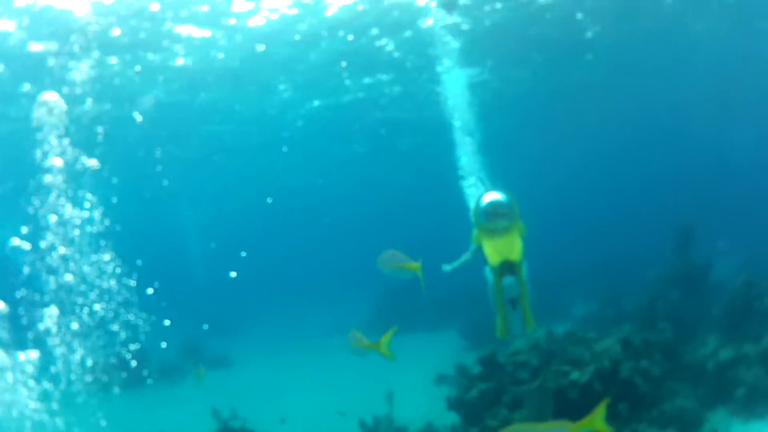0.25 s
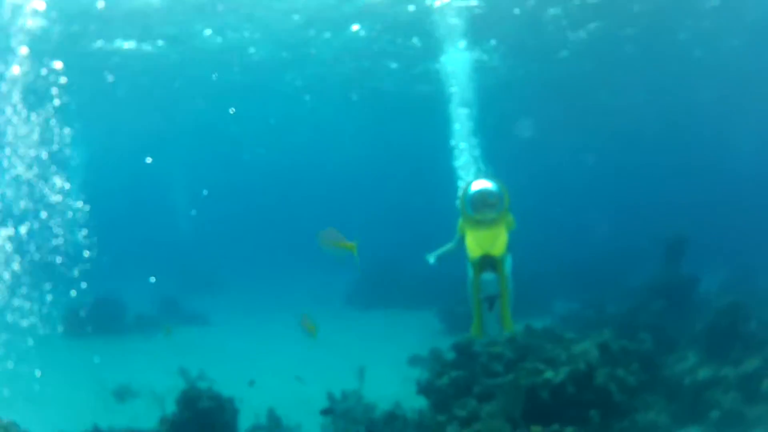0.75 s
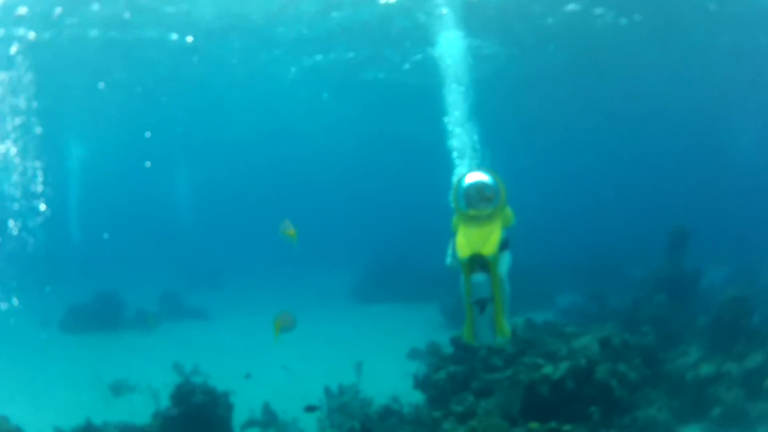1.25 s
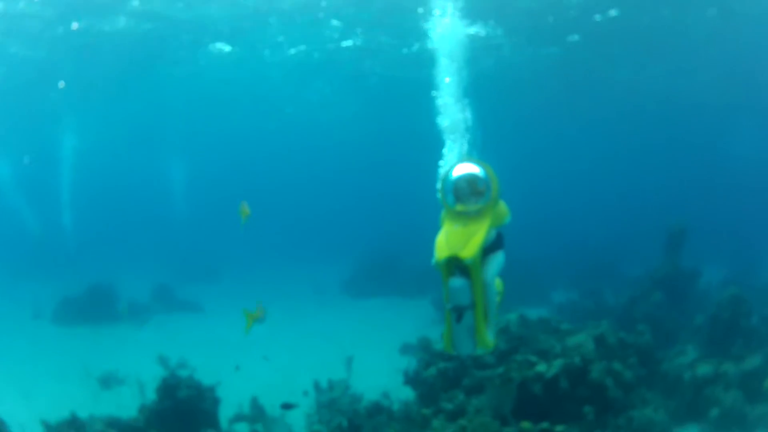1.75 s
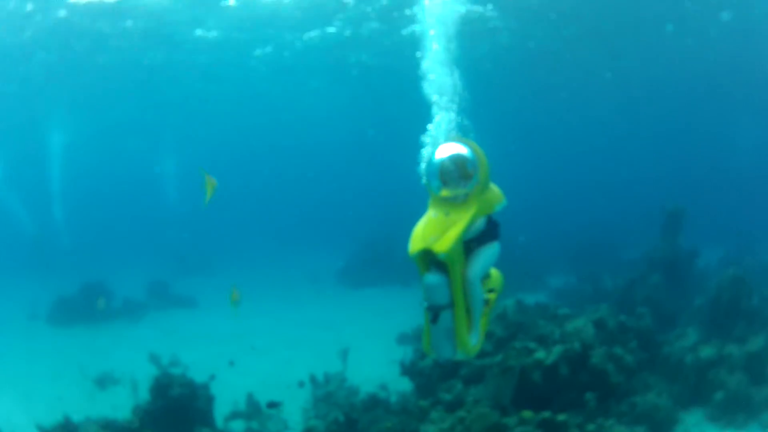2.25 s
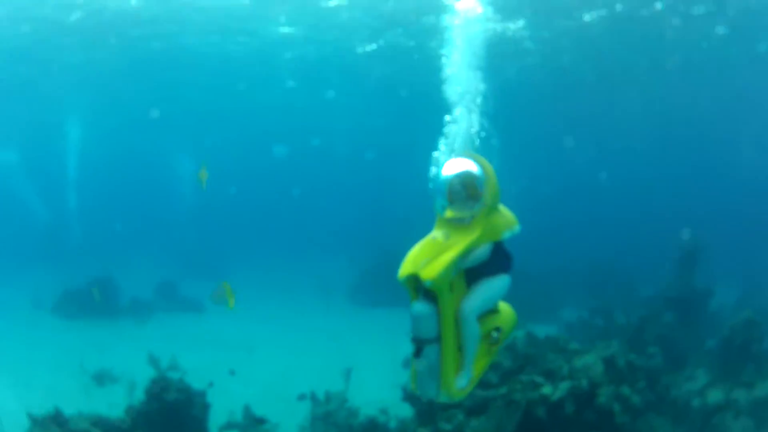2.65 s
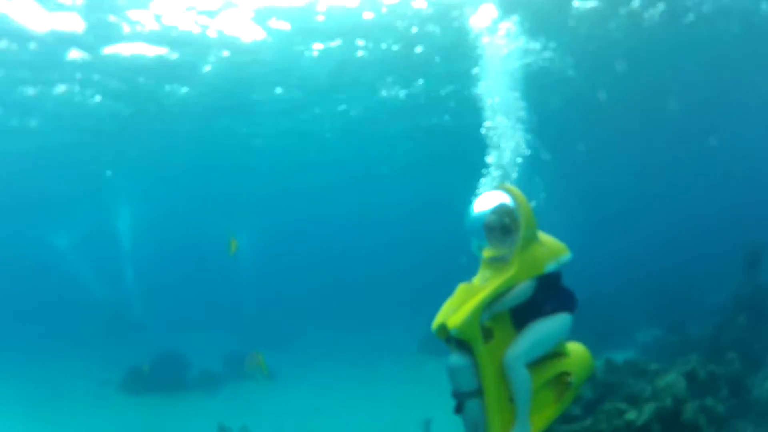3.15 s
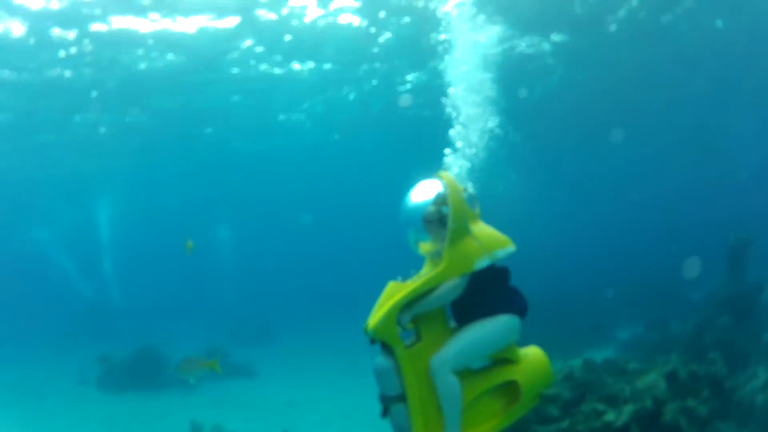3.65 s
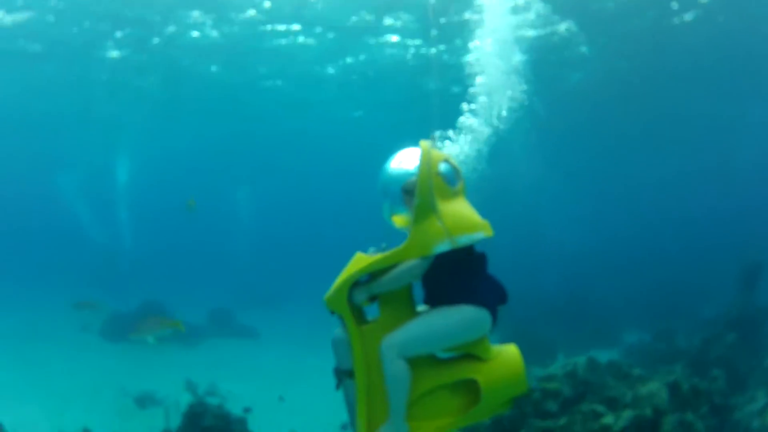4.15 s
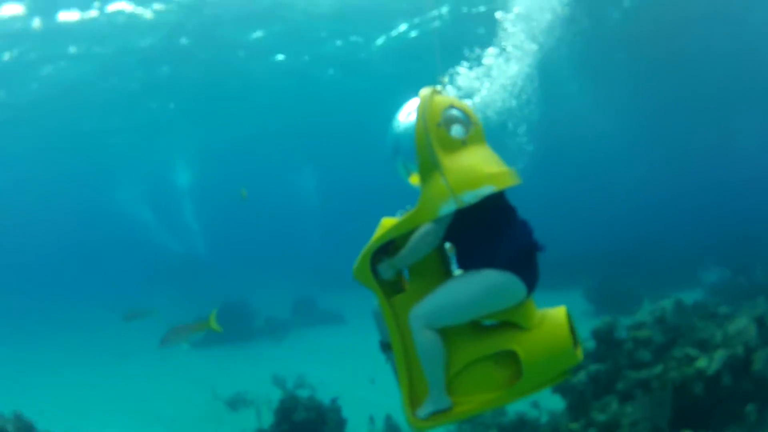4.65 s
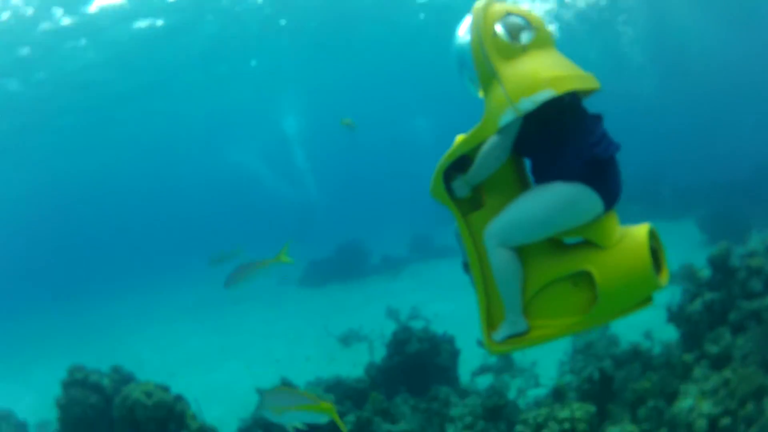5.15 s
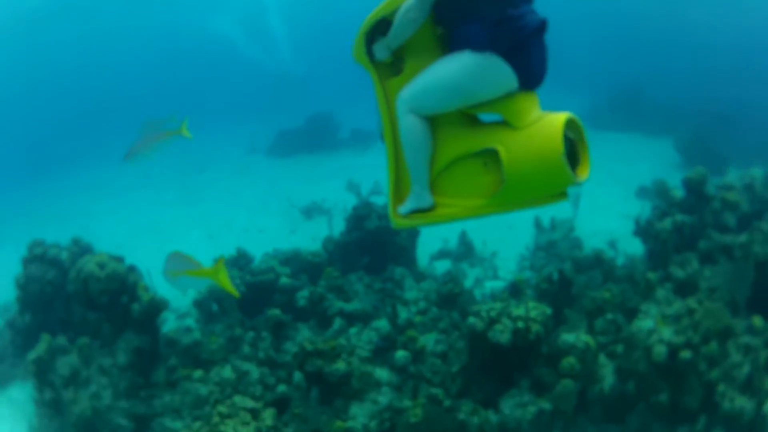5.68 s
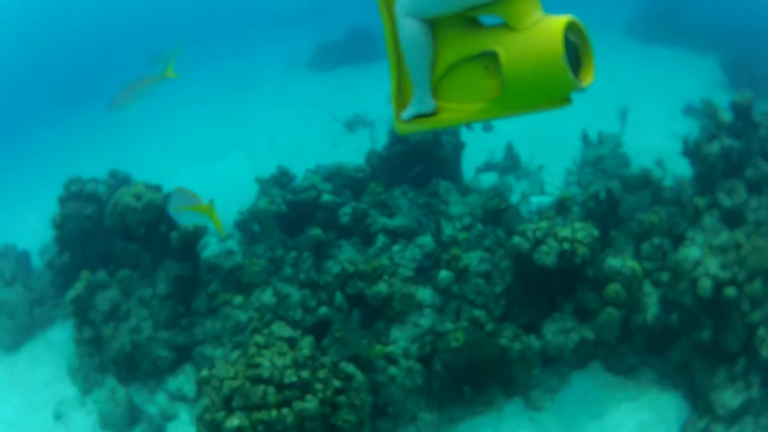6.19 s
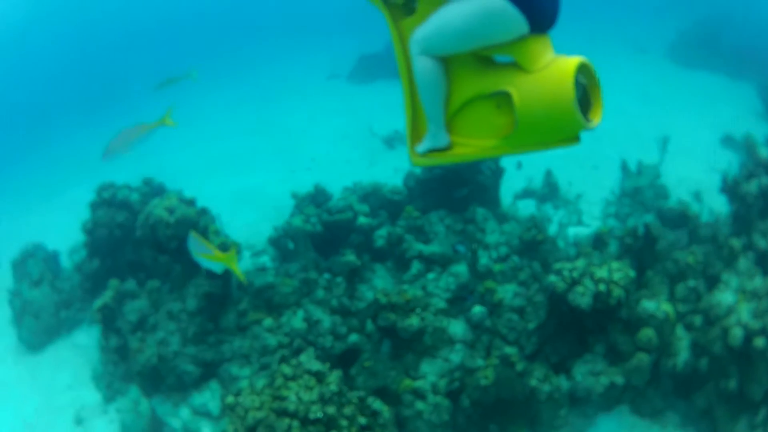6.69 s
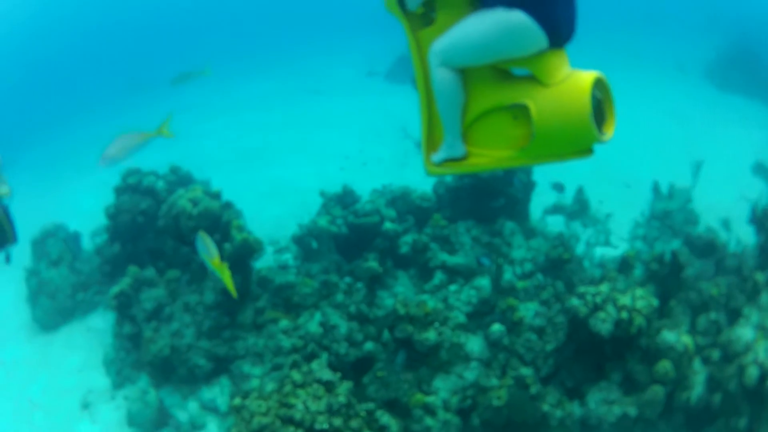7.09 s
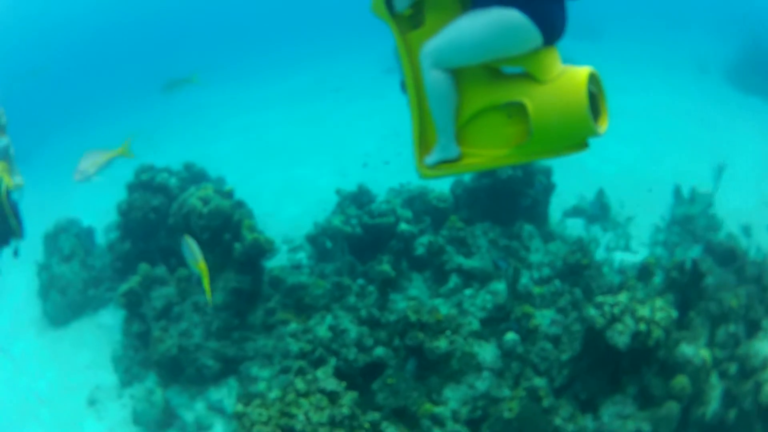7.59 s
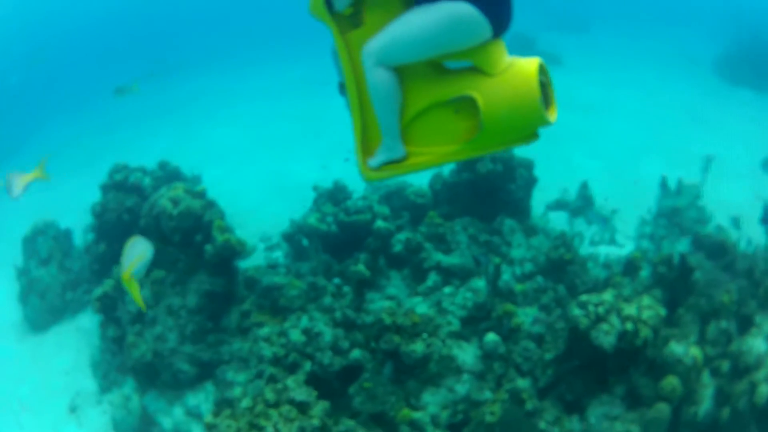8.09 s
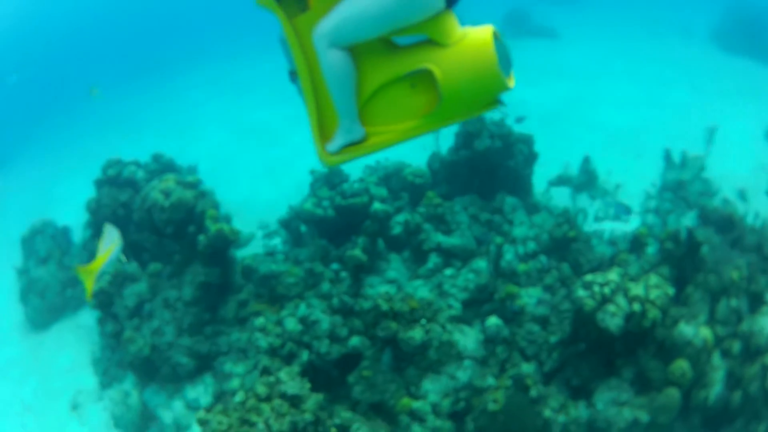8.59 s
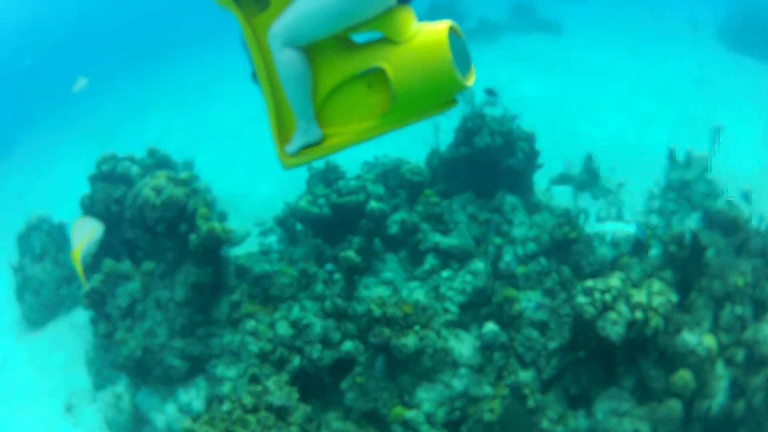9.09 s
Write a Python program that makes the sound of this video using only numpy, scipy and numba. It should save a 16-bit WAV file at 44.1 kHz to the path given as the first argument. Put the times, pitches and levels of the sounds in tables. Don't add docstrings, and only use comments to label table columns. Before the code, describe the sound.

Underwater, a low motor hum with gurgling exhaust bubbles and watery hiss, then a soft crackling propeller flutter as the scooter comes alongside.

```python
import sys
import numpy as np
from scipy import signal
from scipy.io import wavfile
from scipy.ndimage import uniform_filter1d
from numba import njit

SR = 44100
rng = np.random.default_rng(int(sys.argv[2]) if len(sys.argv) > 2 else 0)


def unload_wav(signal):
    wavfile.write(
        sys.argv[1],
        SR,
        np.round(np.clip(np.atleast_2d(signal).T, -1, 1) * 32767).astype(np.int16),
    )


def natural_amplitude(level_db):
    exponent = np.asarray(level_db, float) / 20
    return 10 ** exponent


N = 411453

# (pitch [Hz], width [Hz], level [dB])
DEEP_MODES = [(1393, 175, 10.2), (1705, 137, 4.3)]
MID_MODES = [(2276, 140, 7), (2468, 760, -4), (2865, 103, 1.5), (3300, 720, -11)]


def rms_one(x):
    return x / np.sqrt(np.mean(x ** 2) + 1e-20)


def in_time(rows):
    s, *columns = np.transpose(rows)
    return [np.interp(np.arange(N) / SR, s, c) for c in columns]


def drift(rate):
    r = np.exp(-80 * np.pi * rate / SR)
    slow = signal.lfilter([1], [1, -2 * r, r * r], rng.standard_normal(N // 40 + 2002))[2000:]
    return np.interp(np.arange(N) / 40, np.arange(len(slow)), rms_one(slow))


def flutter(rate):
    quick = drift(rate)
    return rms_one(quick - uniform_filter1d(quick, SR // 5))


def band(x, low_hz, high_hz, order=2):
    return signal.sosfilt(signal.butter(order, [low_hz, high_hz], "band", fs=SR, output="sos"), x)


def low_pass(x, hz, order):
    return signal.sosfilt(signal.butter(order, hz, fs=SR, output="sos"), x)


def resonate(x, modes, filled=False):
    out = np.zeros(N)
    for k, (hz, width_hz, db) in enumerate(modes):
        r = np.exp(-np.pi * width_hz / SR)
        sign = (-1) ** (k * filled)
        top = (1 - r * r) / 2 * np.array([1, 0, -1]) * sign
        out += natural_amplitude(db) * signal.lfilter(top, [1, -2 * r * np.cos(2 * np.pi * hz / SR), r * r], x + 1e-18)
    return out


@njit
def add(out, at, hz, size, cycles, rise, rate):
    for i in range(len(at)):
        phase, span = 0.0, cycles * rate / hz[i]
        for n in range(min(int(5 * span), len(out) - at[i])):
            phase += 2 * np.pi * hz[i] * (1 + rise * n / span) / rate
            swelling = (1 - np.exp(-n * hz[i] / rate)) ** 2
            out[at[i] + n] += size[i] * np.sin(phase) * np.exp(-n / span) * swelling


def bubbles(per_s, centre_hz, octaves, cycles, rise, even, window_s):
    draws = rng.random((int(per_s * N / SR), 2))
    at = (draws[:, 0] * N).astype(np.int64)
    chance = rng.standard_normal((len(at), 2))
    hz = centre_hz[at] * 2 ** (octaves * chance[:, 0])
    out = np.zeros(N)
    add(out, at, hz, natural_amplitude(2.8 * chance[:, 1]), cycles, rise, float(SR))
    window = int(window_s * SR)
    power = uniform_filter1d(uniform_filter1d(out ** 2, window), window) + 1e-9
    return rms_one(out / power ** (even / 2))


def closeness():
    # (time [s], level [dB])
    near = [(0, -23), (2.0, -24.5), (3.2, -26.5), (4.4, -23), (5.2, -27.5), (5.8, -29), (6.2, -32),
            (7.6, -33.5), (9.33, -31)]
    return in_time(near)[0] + 24


def hum():
    # (multiple [-], level over the second order [dB], extra share of closeness [-])
    hum_orders = [(1, -7.5, 0.42), (2, 0.5, 0.028), (3, -0.5, -0.062), (4, -5, -0.29), (5, -9, -.3),
                  (6, -12, -0.58), (7, -19, -0.75)]
    hum_hz = 32.79
    turn = 2 * np.pi * hum_hz * np.arange(N) / SR + .12 * drift(.4)
    close = closeness()
    out = np.zeros(N)
    for k, db, share in hum_orders:
        level_db = close - 24 + db + share * close
        waver_db = 0.72 * drift(1.5) + 1.04 * drift(0.88)
        out += natural_amplitude(level_db + waver_db) * np.sin(k * turn + 6 * rng.random())
    return np.sqrt(2) * out


def swell(s, length_s):
    return 2 ** -((np.arange(N) / SR - s) / (.5 * length_s)) ** 2


def flow():
    # (middle [s], peak [dB], pitch [Hz], length [s])
    gulps = [(0.06, -13.6, 106, 0.16), (0.452, -11, 116.5, 0.073), (0.915, -11.6, 129, 0.1),
             (1.121, -9, 129, 0.037), (1.798, -12.0, 98.5, 0.35), (2, -14, 106, 0.24),
             (2.41, -13, 118.6, 0.057), (2.617, -14.5, 121, 0.044), (2.823, -12.5, 113, 0.11),
             (3.38, -17.1, 121, 0.035), (3.678, -9.5, 117, 0.11), (3.845, -12, 108.8, 0.045),
             (4.255, -12.5, 107, 0.15), (4.47, -13, 112, 0.086), (5.7, -19, 127, 0.031),
             (5.878, -12.5, 140, 0.061), (6.827, -24.5, 105.7, 0.27), (7.068, -24, 118, 0.14),
             (7.353, -22, 120, 0.11), (7.815, -23.5, 114.5, 0.26), (7.97, -22.5, 99.6, 0.22),
             (8.16, -21.4, 119, 0.061), (8.367, -19.8, 122, 0.14), (8.812, -18.5, 123.7, 0.14),
             (9.253, -20.5, 120.4, 0.14)]
    # (middle [s], peak [dB])
    splutters = [(.22, -30), (.46, -29), (.6, -19), (.92, -23.5), (1.7, -18.5), (2.18, -25), (3.85, -24),
                 (4.2, -37), (5.25, -27), (7.3, -27), (8.14, -28.5), (8.27, -25.5)]
    stream_hz, splutter_s = 117, 0.056
    stream_db = -21 + 0.81 * closeness()
    power = natural_amplitude(2 * stream_db)
    pitch = power * stream_hz
    for s, db, hz, length_s in gulps:
        gulp = natural_amplitude(2 * (db - 3.2)) * swell(s, length_s)
        power, pitch = power + gulp, pitch + gulp * hz
    large_db = 10 * np.log10(power)
    fizz_db = -28.5 + 0.34 * closeness() + 0.32 * (large_db - stream_db)
    fizz = natural_amplitude(2 * fizz_db)
    for s, db in splutters:
        fizz = fizz + natural_amplitude(2 * db) * swell(s, splutter_s)
    return large_db, pitch / power, 10 * np.log10(fizz)


def air():
    # (pitch [Hz], width [Hz], level [dB])
    housing_low_modes = [(94.8, 20, 3), (128.6, 22, -0.5)]
    large_db, large_hz, small_db = flow()
    large = bubbles(60, 0.973 * large_hz, octaves=0.15, cycles=1.69, rise=0.056, even=0.34, window_s=0.034)
    large = rms_one(large + resonate(large, housing_low_modes))
    small_hz = 220.7 * natural_amplitude(0.061 * closeness())
    small = bubbles(160, small_hz, octaves=0.34, cycles=2.7, rise=0.077, even=0.34, window_s=0.033)
    gurgle = natural_amplitude(large_db + 0.7) * band(large, 64.4, 195) + natural_amplitude(small_db + 0.68) * small
    rumble = natural_amplitude(-39.5 + 0.24 * (large_db + 42)) * rms_one(band(rng.standard_normal(N), 18, 59))
    seethe = natural_amplitude(-45 + .5 * (small_db + 27.5)) * rms_one(band(rng.standard_normal(N), 195, 356))
    return low_pass(gurgle, 305, order=6) + rumble + seethe


def hiss():
    # (pitch [Hz], width [Hz], level [dB])
    low_modes = [(496, 720, -3), (887, 56, 6.5)]
    water_modes = [(1324, 42, 4), (1840, 87, 7.5), (2355, 187, 6), (2660, 53, 7), (3060, 69, -29),
                   (3715, 153, -3), (4310, 90, -5), (4600, 43, -35), (4890, 100, -29), (6480, 300, -8)]
    high_modes = [(3705, 95, 11), (3800, 98, -2), (4240, 33, 1), (4610, 150, -24), (4950, 130, -38)]
    # (middle [s], half length [s], level [dB])
    puffs = [
        (1.93, 0.0044, -43),
        (7.855, .004, -58),
        (5.905, 0.033, -49.5),
    ]
    t = np.arange(N) / SR
    crackle = (rng.random((3, N)) < 40 / SR) * rng.standard_normal((3, N)) * 2.25
    noise = rng.standard_normal((3, N)) + crackle

    low_db = -44 + 0.37 * closeness()
    low = band(resonate(noise[0], low_modes, filled=True), 253, 1040, order=3)
    low = natural_amplitude(low_db + 1.9 * flutter(12.4)) * rms_one(low)

    water_db = -42 + 0.44 * closeness()
    water = natural_amplitude(water_db + 1.52 * flutter(35)) * rms_one(resonate(noise[1], water_modes))
    gush = rms_one(band(noise[0], 4000, 4700))
    for s, length_s, db in puffs:
        water += natural_amplitude(db) * np.exp(-((t - s) / length_s) ** 4) * gush
    water += natural_amplitude(water_db - 37.0) * rms_one(band(crackle[0], 3900, 5000))

    far_db, near_db, arrives_s, arrival_s = -45.5, -42, 4.6, 1.0
    whirr_db = far_db + (near_db - far_db) / (1 + np.exp((arrives_s - t) / arrival_s))
    whirr = resonate(noise[2], MID_MODES, filled=True) + natural_amplitude(-13.5) * resonate(noise[2], DEEP_MODES)
    whirr += natural_amplitude(-9.0) * resonate(noise[2], high_modes)
    whirr = natural_amplitude(whirr_db + 1.3 * flutter(32)) * rms_one(whirr)
    return low + low_pass(water + whirr, 4800, order=2)


def strays():
    # (time [s], peak [dB], pitch [Hz])
    stray_bursts = [(1.08, -30, 1360), (3.185, -32, 1305), (3.553, -33, 1360), (4.755, -29, 1390),
                    (4.807, -34, 1420), (6.249, -31, 1460), (9.136, -40, 1380), (9.147, -36, 1350),
                    (9.162, -37, 1390), (9.178, -39, 1380), (9.248, -32, 1400), (9.262, -43, 1350),
                    (9.326, -33, 1290)]
    s, db, hz = np.transpose(stray_bursts)
    out = np.zeros(N)
    add(out, (s * SR).astype(np.int64), hz, natural_amplitude(db + 4.5), 7.0, .02, float(SR))
    return out


def knocks():
    # (time [s], ring [dB], thump [dB], bright scuff [dB])
    contacts = [(1.0937, -17, -38, -20), (1.0961, -10, 0, -25), (1.1009, -23, -39, -35),
                (1.11, -23, -8, -42), (1.133, -26, -18, -39), (1.15, -27, -28, -50), (1.227, -28, -10, -53),
                (3.781, -22, -15, -42), (3.787, -28, -28, -50), (3.799, -37, -32, -38),
                (3.809, -19.5, -15, -45), (3.816, -26, -32, -50), (3.838, -27, -20, -51),
                (5.723, -23, -13.5, -50), (5.731, -30, -23, -44), (5.847, -36, -21, -33),
                (5.854, -13.5, -2, -46), (5.861, -24, -16, -46)]
    s, ring_db, thump_db, bright_db = np.transpose(contacts)
    ring, thump, bright = np.zeros((3, N))
    at = (s * SR).astype(int)
    ring[at], thump[at], bright[at] = natural_amplitude(ring_db), natural_amplitude(thump_db), natural_amplitude(bright_db)
    t = np.arange(2000) / SR
    tap = t / 0.00012 * np.exp(1 - t / 0.00011)
    scuff = rng.standard_normal(2000) * np.exp(-t / 0.0055)
    swing = np.sin(2 * np.pi * 215 * t) * t / 0.0035 * np.exp(1 - t / 0.0029)
    ring_modes = [(853, 92, 21.0), (560, 520, 2.1)]
    bright_modes = [(1350, 91, 25.0), (1810, 290, 17.0), (2340, 160, 23.6)]
    ring = resonate(signal.fftconvolve(ring, tap)[:N], ring_modes, filled=True)
    bright = resonate(signal.fftconvolve(bright, scuff)[:N], bright_modes, filled=True)
    return band(ring + bright, 270, 2200, order=3) + signal.fftconvolve(thump, swing)[:N]


def propeller():
    # (time [s], first blade [dB], second blade under it [dB], deep share of first blade [dB])
    load = [(2.0, -39, -5, -1), (2.5, -35.5, -17, 8.5), (3.0, -31.5, -18, -11), (3.2, -34, -8, -1),
            (3.5, -26.5, -13, -9.5), (4.0, -29.5, -18, 6), (4.3, -24.5, -17, 5.5), (4.6, -28, 3.5, 4),
            (4.8, -32, -18, 8), (5.0, -26.5, -20, -5.5), (5.4, -32, -7, 12), (5.6, -25.5, -13, -19),
            (5.9, -28, -5.5, 1), (6.4, -27.5, -4.5, 2), (7.1, -27.5, -2, -4), (7.6, -27, -3.5, -28),
            (8.2, -29.5, -0.5, -34), (9.33, -29, -3, -29)]
    # (time [s], lag [turns])
    lag = [(2.0, 0.495), (2.4, 0.445), (2.85, 0.458), (4.0, 0.308), (4.8, 0.261), (5.7, 0.24), (6.4, 0.275),
           (7.6, 0.282), (8.4, 0.362), (9.2, 0.277), (9.33, 0.26)]
    # (time [s], extra level [dB])
    bites = [(3.696, 3.5), (4.119, 0), (4.172, 3), (4.334, 0.5), (4.52, -3), (4.625, -5), (5.13, 4),
             (5.184, -1), (5.237, -4), (5.397, 2), (5.503, 5.5), (5.558, 4), (5.823, 5), (6.307, 4.5),
             (6.947, 6), (6.997, 4), (7.452, 6), (7.556, 4), (7.747, 3), (8.709, 4), (9.133, 3.5),
             (9.186, 3), (9.24, 6.5)]
    turns_per_s = 18.75
    first_db, under_db, deep_db = in_time(load)
    second_db = first_db + under_db
    half_turns = 2 * (turns_per_s * np.arange(N) / SR - in_time(lag)[0])
    passes = np.arange(0, int(half_turns[-1]) + 1)
    centre = np.searchsorted(half_turns, passes)[:, None]
    first = (passes % 2 == 0)[:, None]
    luck = rng.standard_normal((len(passes), 4, 1))
    late, scatter, size = rng.standard_normal((3, len(passes), 18))

    delay_s = .0007 * luck[:, 0] + np.where(late < 0, .0019, .0029) * late - .0028
    at = np.clip(centre + SR * delay_s, 0, N - 1).astype(np.int64)
    spread = np.interp(deep_db[centre], [-25, -5], [.55, 1])
    hz = 2420 * 2 ** (.05 * luck[:, 2] + spread * (.07 * late + .14 * scatter - .11))
    nearing = np.clip(centre / SR / 0.45 - .2, .05, 1)
    level_db = np.where(first, first_db[centre], second_db[centre]) + 1.2 * luck[:, 1] + 2.5 * size
    depth_db = np.where(first, deep_db[centre], -12.0) + 2.2 * luck[:, 3]
    gain = natural_amplitude(level_db + np.where(hz < 1950, depth_db, 0)) * nearing
    cloud = np.zeros(N)
    add(cloud, at.ravel(), hz.ravel(), gain.ravel(), 2.2, .03, float(SR))
    rung = resonate(cloud, MID_MODES, filled=True) - natural_amplitude(-6.5) * resonate(cloud, DEEP_MODES)

    turn = np.clip(np.round(half_turns), 0, len(passes) - 1).astype(int)
    chance = np.bincount(turn, rung ** 2) / np.mean(gain ** 2, axis=1)
    even = (np.median(chance) / chance) ** (0.6 / 2)
    for s, db in bites:
        even[turn[int(s * SR)]] *= natural_amplitude(db)
    return natural_amplitude(7.5) * rung * uniform_filter1d(even[turn], size=200)


def scene():
    # (pitch [Hz], width [Hz], level [dB])
    notches = [(990, 80, -9), (1120, 190, -10), (2010, 110, -10), (2870, 120, -4), (3830, 80, -6),
               (4130, 150, -3)]
    inside = hum() + air()
    shell = hiss() + strays() + knocks() + propeller()
    for hz, width_hz, db in notches:
        shell = shell - (1 - natural_amplitude(db)) * resonate(shell, [(hz, width_hz, 0)])
    opening = np.clip(np.arange(N) / (.003 * SR), 0, 1)
    return (opening * (inside + shell))[None, :]


def roll_off(x):
    return signal.sosfilt(signal.butter(12, 16270, fs=SR, output="sos"), x)


def record(dry):
    hold_hz, work_hz = 12000, 48000
    smooth = signal.sosfilt(signal.cheby1(8, .1, 5620, fs=SR, output="sos"), np.clip(dry, -1, 1))
    fine = signal.resample_poly(smooth, work_hz, SR, axis=1)
    step = work_hz // hold_hz
    held = np.repeat(fine[:, step // 2::step], step, axis=1)
    back = signal.resample_poly(held, SR, work_hz, axis=1)
    back = np.pad(back, ((0, 0), (0, 16)))[:, :N]
    mix = signal.sosfilt(signal.ellip(12, .3, 60, 15280, fs=SR, output="sos"), back)
    return roll_off(mix)


dry = scene()
out = record(dry)
unload_wav(out)
```